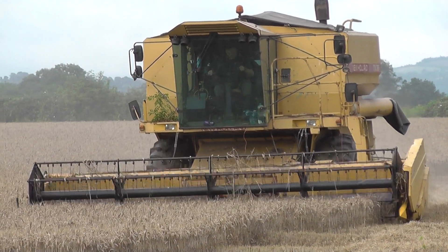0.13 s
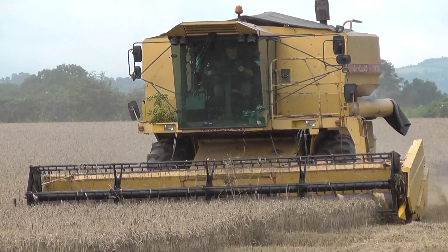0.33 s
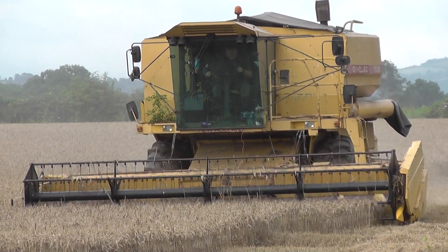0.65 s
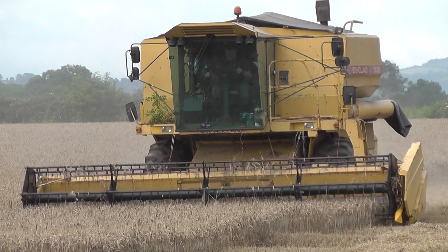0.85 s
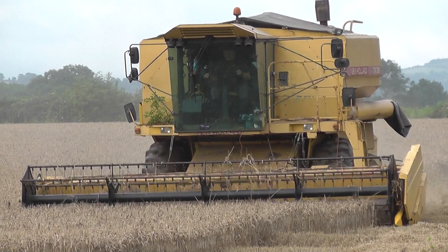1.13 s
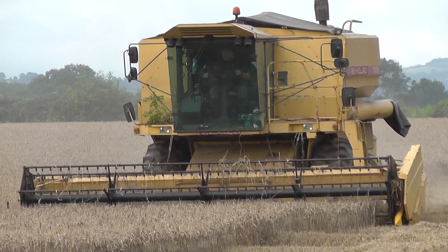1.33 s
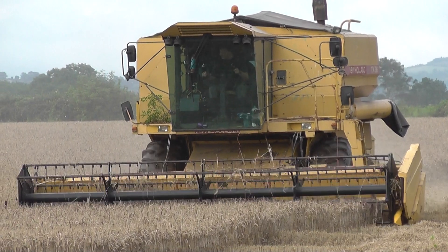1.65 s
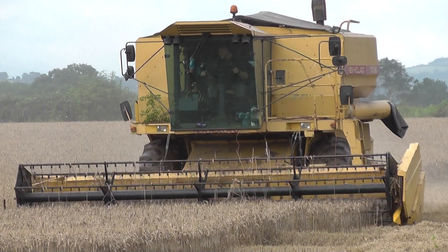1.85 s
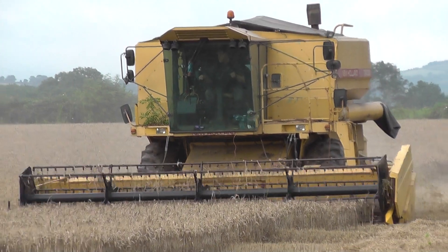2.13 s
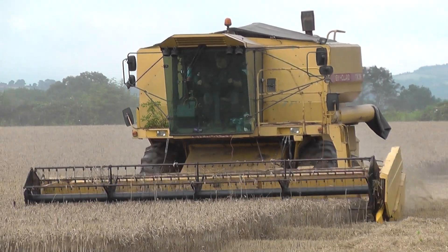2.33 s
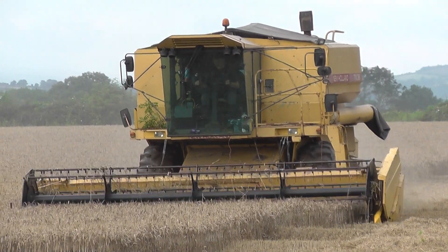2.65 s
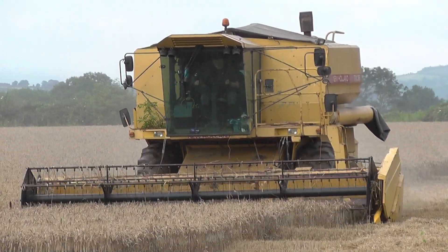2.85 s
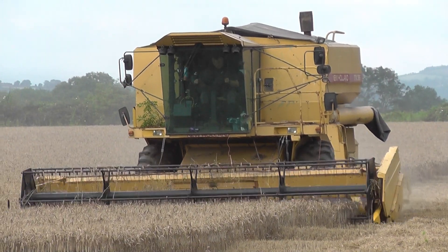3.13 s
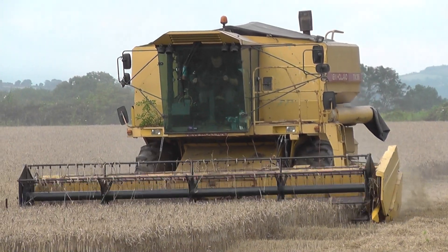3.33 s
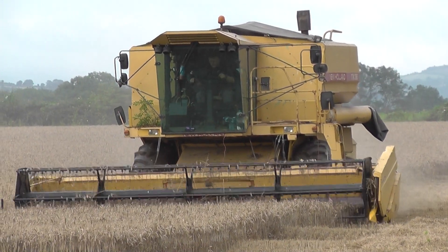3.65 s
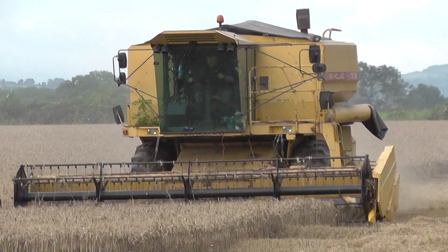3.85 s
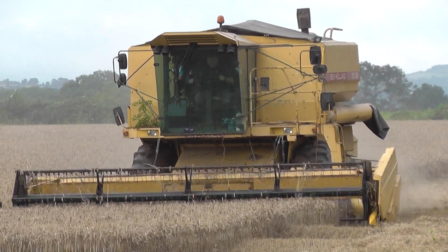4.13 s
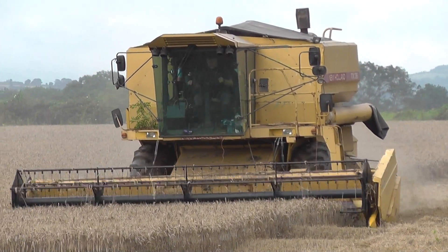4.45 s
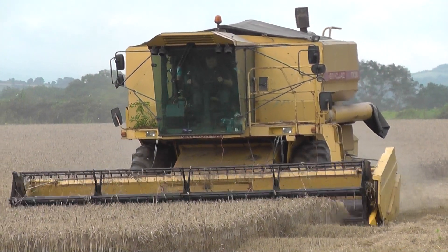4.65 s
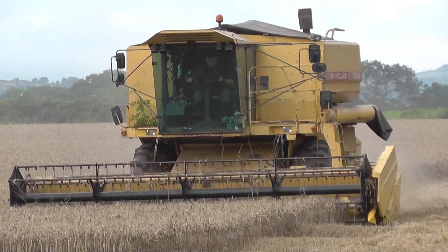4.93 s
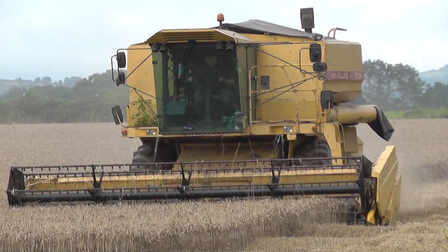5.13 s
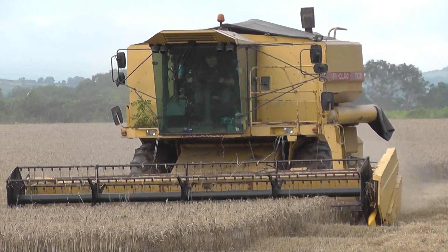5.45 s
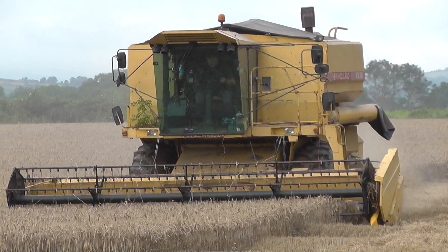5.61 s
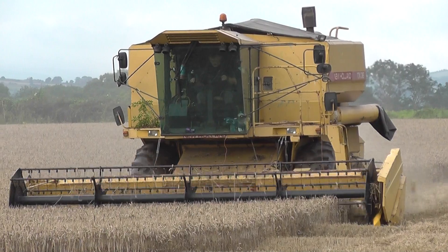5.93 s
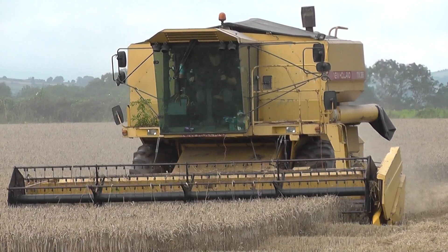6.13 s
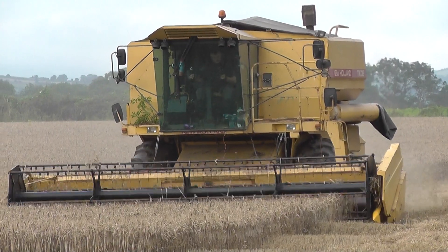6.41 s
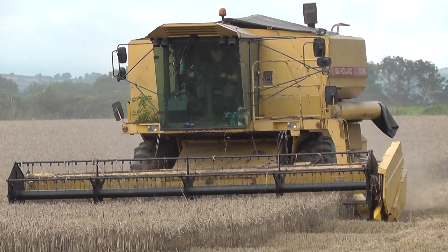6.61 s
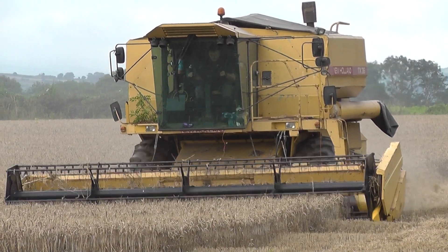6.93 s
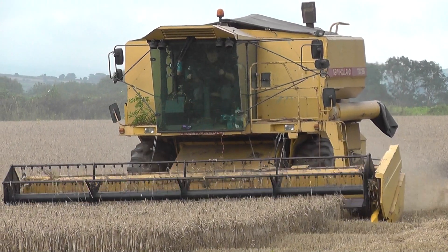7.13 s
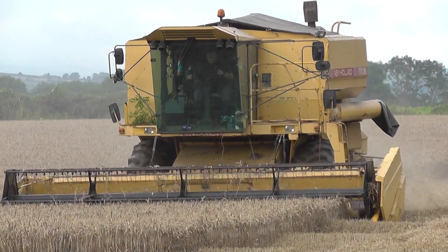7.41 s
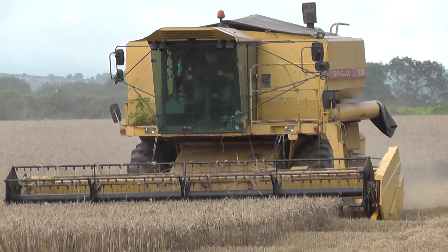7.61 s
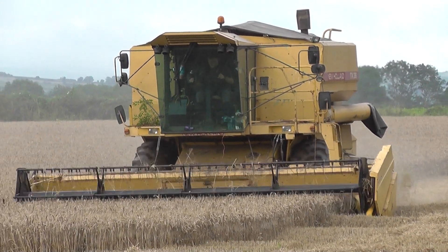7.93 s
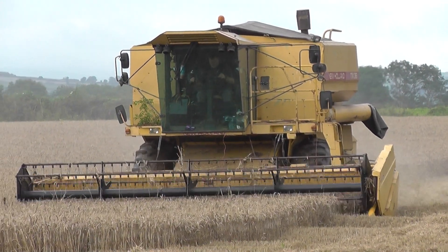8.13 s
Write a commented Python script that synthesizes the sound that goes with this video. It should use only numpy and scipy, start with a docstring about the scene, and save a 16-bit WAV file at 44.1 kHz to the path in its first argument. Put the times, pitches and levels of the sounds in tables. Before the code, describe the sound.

Continuous harvesting machinery outdoors, picked up by a small stereo microphone in front. The thick low drone hunts gently up and down above deep engine rumble, with a faint gear whine coming and going. Broad, grainy straw noise hisses in rapid strokes and pulses with the shakers. Fine clatter of grain on sheet metal, scattered clanks and tiny squeaks dot it. There is no start or stop, and a light breeze lies almost hidden beneath.

```python
"""A toothed shaft drive drones and sags under load beside a governed diesel as a combine harvester works wheat.
Straw rushes through the header, the knife hisses at each stroke and the shakers thump about three times a second.
Drive, engine and whine are sines; the rush and its clanks are shaped noise, clatter is small struck resonances,
squeaks pair a whistle with filtered noise, and a light breeze is low noise.
All is heard from the front by a small stereo microphone with two ports."""
import sys
import numpy as np
from scipy import signal
from scipy.fft import rfft, irfft, next_fast_len
from scipy.io import wavfile
from scipy.ndimage import uniform_filter1d

SR = 44100
rng = np.random.default_rng(int(sys.argv[2]) if len(sys.argv) > 2 else 0)


def dump_mix(stems):
    """Bounce the given channels to the path in sys.argv[1] as a 16-bit WAV at rate SR."""
    frames = np.atleast_2d(stems).T  # one column per channel
    limited = np.clip(frames, -1, 1)  # hard clip at full scale
    pcm = np.round(limited * 32767).astype(np.int16)
    wavfile.write(sys.argv[1], SR, pcm)


N = 364707

# The straw and machinery rush swelling about its mean, before the top octave is evened out.
# Each row: time in seconds, swell at 1-4 kHz in dB, swell above 4 kHz in dB.
RUSH_SWELLS = [(0.0, -1, -1.5), (0.6, -0.5, -.5), (1.4, 1, 1.5), (2.09, -1, -1), (3.36, 0, -2),
               (4.33, -.5, -1), (4.6, 0, 1), (4.9, 1, 1), (5.23, 0, -.5), (5.6, 0, 1.5), (6.31, 1, -1),
               (6.7, -1.5, -0.5), (7.02, 1.5, 1.5), (7.49, 0, -.5), (8.27, 1, .5)]
# Low rumble, alike in both ports. Each row: frequency in Hz, level in dB per Hz.
RUMBLE_SPECTRUM = [(25, -93), (40, -88), (55, -62.5), (80, -60), (110, -50.5), (145, -50), (190, -46.5),
                   (260, -50), (300, -53), (345, -58), (390, -64)]
# Colour of the rush at the two ports.
# Each row: frequency in Hz, left level in dB per Hz, right level in dB per Hz, likeness from 0 to 1.
PORT_SPECTRA = [(427, -70, -71, 0.9), (494, -77.5, -76.5, 0.43), (604, -66, -64, 0.97),
                (788, -63.5, -64.5, 0.97), (883, -65.5, -65.5, 0.97), (1264, -72.5, -70, 0.83),
                (1510, -70, -71, 0.99), (1814, -66, -65, 0.99), (1990, -77.8, -68.5, 0.64),
                (2220, -67, -77, 0.7), (2680, -73, -69, 0.83), (2990, -70, -70.5, 1.0),
                (3090, -68, -67.5, 0.97), (3957, -70.5, -68, 0.91), (3975, -73.1, -75, 0.96),
                (4070, -79, -79, 0.42), (4250, -79.8, -75.5, 0.52), (4480, -84, -79, 0.38),
                (4720, -74, -72.5, 0.99), (5300, -85, -77.5, 0.46), (5680, -84, -74, 0.69),
                (5780, -88.3, -77, 0.32), (6210, -79.4, -78, 0.81), (6400, -84, -79, 0.38),
                (7040, -80.5, -82, 0.8), (7470, -78, -90, 0.3), (7460, -76, -92.8, 0.09),
                (7870, -77, -80.5, 0.94), (9500, -85, -82.5, 0.78), (9780, -95.0, -82, 0.48),
                (11470, -97, -88, 0.6), (12600, -99.1, -93, 0.7), (13100, -104.6, -97, 0.43),
                (14300, -110.7, -101.2, 0.13), (15300, -118.4, -128.8, 0.06)]
# Sound bends round the housing, so the ports differ in phase.
# Each row: frequency in Hz, lead of the left port in radians.
PORT_LEAD = [(400, -0.0), (1800, -0.3), (2050, 1.1), (2270, 0.1), (2600, -0.6), (2900, -0.0), (3250, -0.5),
             (4150, -0.7), (4500, -4.4), (4750, -6.7), (5250, -10.0), (5700, -13.5), (6200, -18.3),
             (6500, -22.5), (7300, -23.6), (7800, -20.4), (8100, -19.9), (9600, -20.9), (9900, -19.7),
             (11000, -19.4), (15000, -19.4)]
# Loose parts clanking, set against the steady rush before the band weights.
# Each row: start in seconds, level near 4 kHz in dB, brightness in dB per octave.
CLANK_HITS = [(0.178, 10, 0), (0.5601, 8, 1.5), (0.6744, -4.5, 12), (0.7701, -2, 3), (0.8684, 6, 1.5),
              (1.116, 5.5, 1), (1.2243, 7.5, 2), (1.5824, 5, 4), (1.9093, 6, -2.5), (2.2523, 3.5, -2),
              (2.5354, 2.5, -2), (2.9754, 6.5, 0.5), (3.0335, 5.5, 0), (3.8312, 1, 11), (4.0233, 5.5, 1.5),
              (4.3735, 6, -1), (4.7092, 1.5, 6), (4.7417, 8, .5), (4.766, 6, -1), (5.4001, 5.5, -1),
              (5.5494, 1, 1.5), (6.1063, 6, 0), (6.1834, 2, -3), (6.3829, 0, 6), (6.572, 2, 1.5),
              (6.8713, 4.5, -3), (7.0665, 2.5, 4), (7.1721, 3, -2), (7.8506, 2.5, -3), (8.2475, 2.5, 4)]
# Squeaks of rubbing metal.
# Each row: centre in seconds, pitch in Hz, peak level in dB rms, time to fall to 1/e in seconds, width in Hz.
SQUEAK_EVENTS = [(3.13, 1880, -33.5, .015, 200), (3.3, 2950, -37, .02, 500), (3.268, 3400, -32, .028, 350),
                 (4.385, 2850, -36, .015, 600), (2.35, 3550, -39, .015, 300), (6.272, 3450, -37, .014, 200),
                 (6.39, 1750, -37, .014, 200)]
# Governed engine and fan tones. Each row: pitch in Hz, level in dB rms, depth of wavering in dB.
ENGINE_TONES = [(83.7, -45, 4), (130.13, -31, -3), (636, -54.5, 2.0), (2730, -54.5, 4)]
# A gear whine that comes and goes. Each row: time in seconds, pitch in Hz, level in dB rms.
GEAR_WHINE = [(0, 783.5, -51), (.4, 783, -48), (1.3, 783, -55), (2.4, 782, -44), (2.9, 783.3, -58),
              (3.35, 780.8, -43), (3.75, 780.5, -41.5), (4.1, 783, -48), (4.6, 784, -56), (5.5, 785, -44),
              (6.15, 783, -50), (6.65, 786.5, -43), (7.2, 781.3, -46), (7.7, 781, -54), (8.27, 781, -54)]
# The drive hunting under load, before inertia rounds it. Each row: time in seconds, shaft speed in turns per second.
SHAFT_SPEED = [(0, 7.34), (.2, 7.33), (.45, 7.155), (.75, 7.2), (1.25, 7.25), (1.55, 7.215), (1.88, 7.09),
               (2.1, 7.23), (2.5, 7.195), (2.9, 7.325), (3.2, 7.165), (3.6, 7.25), (3.9, 7.165),
               (4.25, 7.285), (4.58, 7.27), (4.9, 7.12), (5.08, 7.125), (5.33, 7.28), (5.72, 7.255),
               (6.02, 7.18), (6.67, 7.38), (7.37, 7.065), (7.65, 7.25), (7.97, 7.325), (8.15, 7.22),
               (8.27, 7.22)]
# Level of the drone. Each row: time in seconds, mesh tone in dB rms, its octave in dB rms.
DRONE_LEVELS = [(0, -17, -21), (.25, -17.5, -18.5), (.9, -17.7, -20.5), (1.5, -16.5, -20), (2, -18.5, -20),
                (2.3, -16, -20), (2.76, -17.5, -21.5), (3, -15, -19), (3.3, -17, -21), (3.6, -16, -20),
                (4, -18, -22), (4.5, -17.5, -20.5), (4.76, -15.5, -18.5), (5.05, -19, -20),
                (5.55, -16, -20.5), (6, -16.5, -20.5), (6.7, -18.5, -21), (7.05, -14, -19), (7.3, -16, -18),
                (7.55, -18.5, -22), (8, -16.5, -19.5), (8.27, -16, -22)]
# Weaker shaft tones. Each entry: multiple of the shaft rate.
SHAFT_ORDERS = [8, 10, 14, 21, 24, 27, 28, 31, 35, 38, 41, 42, 45, 51]
# Their levels before wavering. Each entry: level in dB rms, in the same order.
SHAFT_ORDER_LEVELS = [-52, -50, -46.5, -47, -32, -41, -41.5, -26.5, -41, -32.5, -43, -47.5, -49, -39.5]

WIND_DB, WIND_HZ = -41, 45  # rms before wavering and the bass cut, band centre
KNIFE_HZ, KNIFE_START, KNIFE_DB = 18.63, 0.56, 2  # strokes per s, cycle position at 0 s, treble swell
SHAKER_HZ, SHAKER_START, SHAKER_DB = 2.87, 0.49, 1.75  # the same for the shakers, in mids and treble
AIR_STEADY = 0.88  # share of the swells left in the top octave, where an even hiss covers them
CLANK_ATTACK_S, CLANK_T60_S = .0017, 0.096
CLANK_AIR_DB = -4  # clanks fall off in the top octave
CLATTER_PER_S, CLATTER_DB, CLATTER_T60_S = 120, -47, 0.036  # mean hits per s, dB rms, ring time
WHINE_OCTAVE_DB, WHINE_SIDE_HZ, WHINE_SIDE_DB = -11, 22, -7  # its octave, and a side tone just below it
TEETH = 17  # the tooth mesh sounds at this multiple of the shaft rate
INERTIA_S = .1  # the heavy shaft rounds every change of speed
WOBBLE_HZ, WOBBLE_TURNS = 5.3, .0006  # a slower pulley shakes the shaft
ORDER_WAVER_DB, ORDER_WAVER_PER_S = 2.1, 1.5
CUTOFF_HZ = 15600
T = np.arange(N) / SR
SIZE = next_fast_len(N + SR // 4)
HZ = np.maximum(np.arange(SIZE // 2 + 1) * SR / SIZE, 1)


def amp(db):
    """Decibels to gain."""
    return 10 ** (np.asarray(db) / 20)


def in_time(rows):
    """Columns of a curve table at every sample."""
    s, *columns = np.transpose(rows)
    return [np.interp(T, s, c) for c in columns]


def in_hz(rows):
    """Columns of a spectrum table at every FFT bin, joined along log frequency."""
    hz, *columns = np.transpose(rows)
    return [np.interp(np.log(HZ), np.log(hz), c) for c in columns]


def drift(rate):
    """Slow random wander of spread 1: coarse noise through a double one-pole low-pass at rate Hz."""
    step = 40  # samples between coarse points
    r = np.exp(-2 * np.pi * rate * step / SR)
    coarse = rng.standard_normal(N // step + 2002)
    slow = signal.lfilter([1], [1, -2 * r, r * r], coarse)[2000:]  # drop the filter's run-in
    return np.interp(np.arange(N) / step, np.arange(len(slow)), slow / slow.std())


def throb(hz, start, sharp):
    """A swell peaking at 1 once a cycle, narrower as sharp grows, taken about its mean."""
    swell = np.exp(sharp * (np.cos(2 * np.pi * (hz * T + start)) - 1))
    return swell - swell.mean()


def tone(turns, db):
    """A sine of the given rms level, its phase counted in turns."""
    return np.sqrt(2) * amp(db) * np.cos(2 * np.pi * turns)


def wind():
    """A light breeze: wavering low noise, separate on each port."""
    band = signal.butter(2, [WIND_HZ / 2, WIND_HZ * 2], "band", fs=SR, output="sos")
    low = signal.sosfilt(band, rng.standard_normal((2, N)))
    return amp(WIND_DB + 2.7 * drift(2.7)) * low / low.std()


def clank_power(octaves):
    """Loose parts struck: decaying extra noise power, in a band so many octaves above 4 kHz."""
    power, t = np.zeros(N), T[:SR // 3]
    shape = np.minimum(t / CLANK_ATTACK_S, 1) * amp(-60 * t / CLANK_T60_S)
    for s, db, tilt in CLANK_HITS:
        i = round(s * SR)
        power[i:i + len(t)] += (amp(db + tilt * octaves) * shape[:N - i]) ** 2
    return power


def swelling_noise():
    """Overlapping octave bands of noise swelled by straw, shakers, knife and clanks; three independent streams."""
    mid_db, top_db = in_time(RUSH_SWELLS)
    knife_db = KNIFE_DB * throb(KNIFE_HZ, KNIFE_START, 1.6)
    shaker_db = SHAKER_DB * throb(SHAKER_HZ, SHAKER_START, 2.3)
    white = rfft(rng.standard_normal((3, SIZE)))
    together_db = .5 * drift(7.3)
    noise = np.zeros((3, N))
    place = np.clip(np.log2(HZ / 700), -1, 4)  # octaves above 700 Hz
    for k in range(-1, 5):
        # cosine-squared slopes make the bands sum to the full spectrum
        band_gain = np.cos(np.pi / 2 * np.clip(place - k, -1, 1)) ** 2
        band = irfft(white * band_gain, SIZE)[:, :N]
        high, bright = np.clip(k / 2, 0, 1), np.clip(k - 2, 0, 1)  # weights of mids and treble
        swell_db = (1 - bright) * high * mid_db + bright * top_db
        swell_db = swell_db + high * (shaker_db + together_db)
        swell_db = swell_db + bright * knife_db + .5 * drift(18.)
        top_octave = k == 4
        clanks = high * clank_power(k - 2.5) * amp(CLANK_AIR_DB * top_octave) ** 2
        power = amp(swell_db) ** 2 + clanks
        noise += band * power ** (AIR_STEADY / 2 if top_octave else .5)
    return noise


def rush():
    """Straw and machinery: swelling noise coloured and phase-shifted by the two ports, partly shared between them."""
    rumble = [(hz, db, db, .97) for hz, db in RUMBLE_SPECTRUM]
    left_db, right_db, alike = in_hz(rumble + PORT_SPECTRA)
    alike = np.clip(alike, 0, 1)
    shared, *own = rfft(swelling_noise(), SIZE)
    left = amp(left_db) * np.exp(1j * in_hz(PORT_LEAD)[0])
    out = []
    for port, side in zip([left, amp(right_db)], own):
        mix = np.sqrt(alike) * shared + np.sqrt(1 - alike) * side
        out.append(irfft(np.sqrt(SR / 2) * port * mix, SIZE)[:N])  # sqrt(SR / 2): levels are per Hz
    return np.array(out)


def clatter():
    """Grain and small parts on sheet metal: random hits, each ringing briefly at one of a dozen panel pitches."""
    strength = amp(3.7 * np.minimum(rng.exponential(1, N), 4))
    hits = (rng.random(N) < CLATTER_PER_S / SR) * strength
    panel = rng.integers(0, 12, N)
    r = amp(-60 / (CLATTER_T60_S * SR))  # decay per sample
    out = np.zeros(N)
    for k, hz in enumerate(np.geomspace(1600, 3900, 12)):
        w = 2 * np.pi * hz / SR
        struck = hits * (panel == k) + 1e-18  # tiny offset keeps the filter from stalling on denormals
        out += signal.lfilter([0, np.sin(w)], [1, -2 * r * np.cos(w), r * r], struck)
    return amp(CLATTER_DB) * out / out.std()


def squeaks():
    """Rubbing metal: a wavering whistle and noise in the same resonance, under a bell-shaped swell."""
    out = np.zeros(N)
    for s, hz, db, half, width_hz in SQUEAK_EVENTS:
        band = signal.butter(2, [hz - width_hz / 2, hz + width_hz / 2], "band", fs=SR, output="sos")
        rasp = signal.sosfilt(band, rng.standard_normal(N))
        whistle = tone(hz * T + .2 * drift(30.), 0)
        swell = np.exp(-((T - s) / half) ** 2)
        out += amp(db - 3) * swell * (rasp / rasp.std() + whistle)  # -3 dB: two equal parts add
    return out


def gear_whine():
    """A gliding gear tone with its octave and a wavering side tone just below."""
    whine_hz, whine_db = in_time(GEAR_WHINE)
    turns = np.cumsum(whine_hz) / SR
    out = tone(turns, whine_db) + tone(2 * turns, whine_db + WHINE_OCTAVE_DB)
    side_db = whine_db + WHINE_SIDE_DB + 3 * drift(1.4)
    return out + tone(turns - WHINE_SIDE_HZ * T, side_db)


def engine():
    """Governed engine and fan tones that all but hold their pitch and waver in level."""
    out = np.zeros(N)
    for hz, db, waver_db in ENGINE_TONES:
        turns = hz * (T + 2.5e-4 * drift(1.35)) + rng.random()
        out += tone(turns, db + waver_db * drift(1.34))
    return out


def drive():
    """Whole multiples of one shaft rate; the octave opposes the mesh tone, making sharp troughs."""
    mesh_db, octave_db = in_time(DRONE_LEVELS)
    speed = uniform_filter1d(in_time(SHAFT_SPEED)[0], size=round(INERTIA_S * SR))
    turns = np.cumsum(speed) / SR
    turns = turns + WOBBLE_TURNS * np.sin(2 * np.pi * (WOBBLE_HZ * T + 0.23 * drift(0.51)))
    out = tone(TEETH * turns, mesh_db) - tone(2 * TEETH * turns, octave_db)
    for order, level_db in zip(SHAFT_ORDERS, SHAFT_ORDER_LEVELS):
        waver_db = ORDER_WAVER_DB * drift(ORDER_WAVER_PER_S)
        out += tone(order * turns + rng.random(), level_db + waver_db)
    return out


def scene():
    """All sources on two ports; the tones reach both nearly alike, a shade stronger and earlier on the right."""
    tones = drive() + engine() + gear_whine()
    delay_s = 4.5e-5 * (1 + 0.24 * drift(0.97))
    late = np.interp(T - delay_s, T, tones)
    placed_tones = np.array([late, tones]) * amp([[-.15], [.15]])
    metal = (squeaks() + clatter()) * amp([[-.6], [.6]])
    return placed_tones + metal + rush() + wind()


def record(dry):
    """The microphone rolls off the deepest bass; the top is cut steeply."""
    thin = signal.sosfilt(signal.butter(3, 45., "high", fs=SR, output="sos"), dry)
    return signal.sosfilt(signal.ellip(8, .5, 40, CUTOFF_HZ, fs=SR, output="sos"), thin)


dry = scene()
out = record(dry)
dump_mix(out)
```